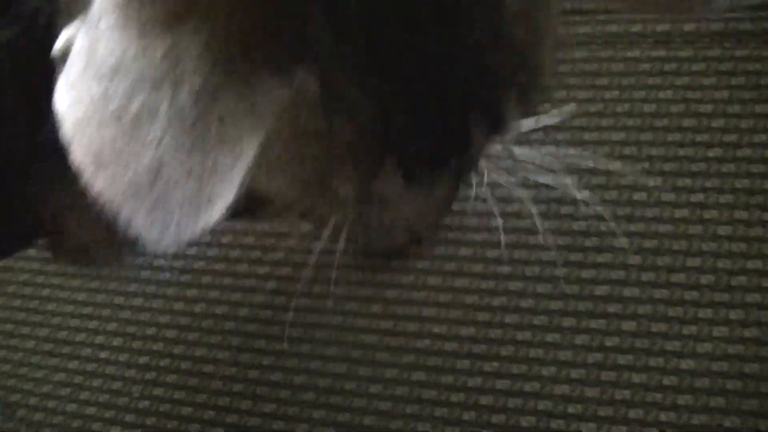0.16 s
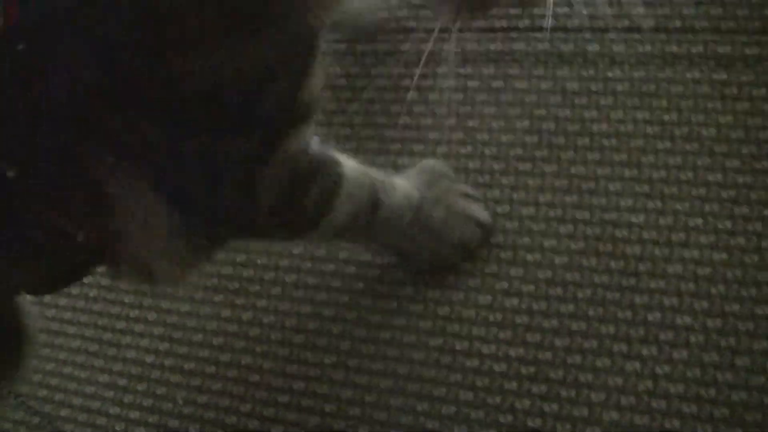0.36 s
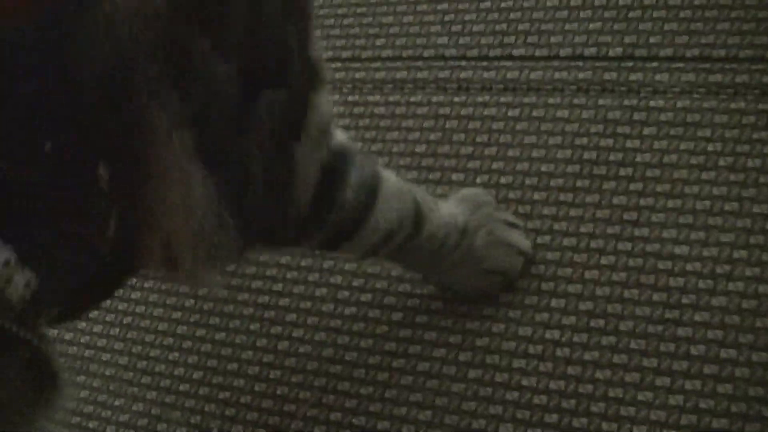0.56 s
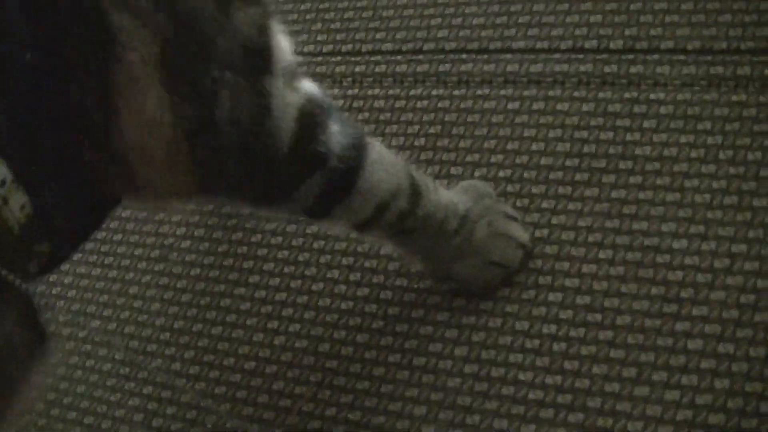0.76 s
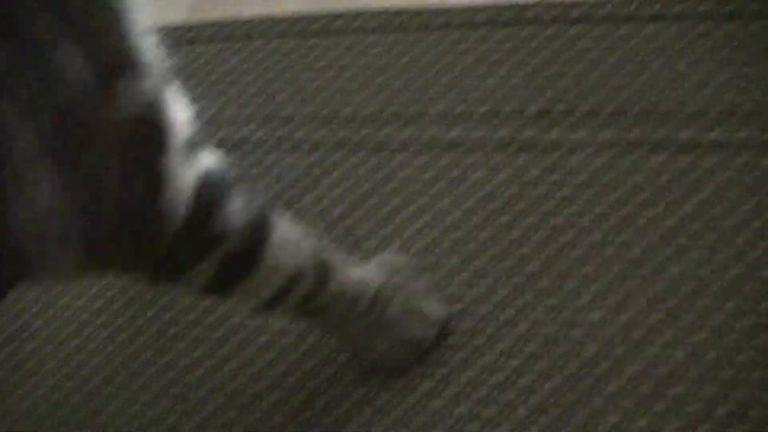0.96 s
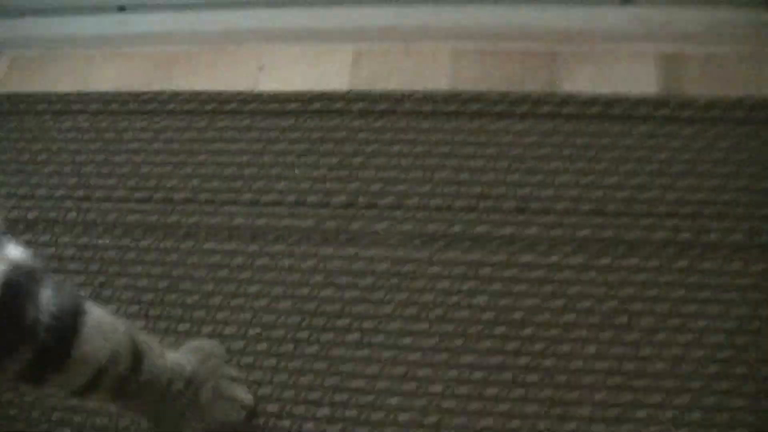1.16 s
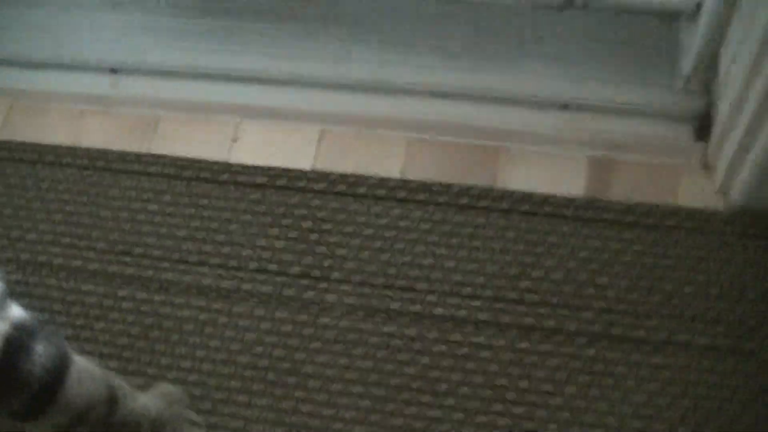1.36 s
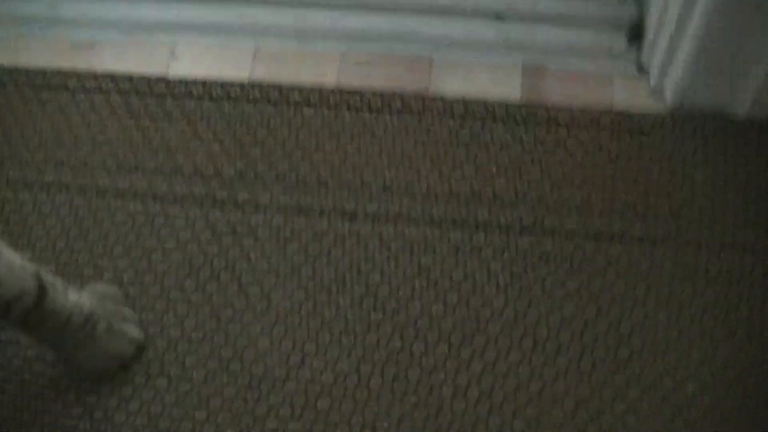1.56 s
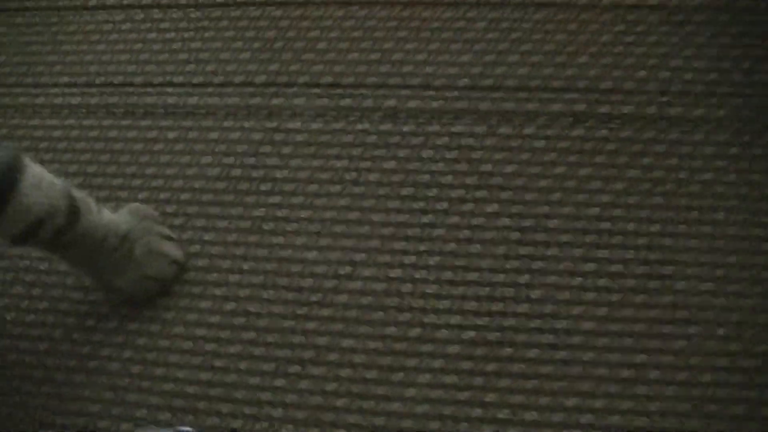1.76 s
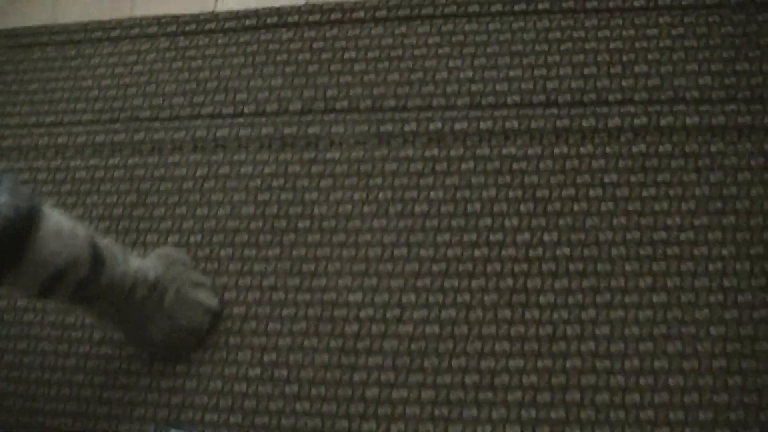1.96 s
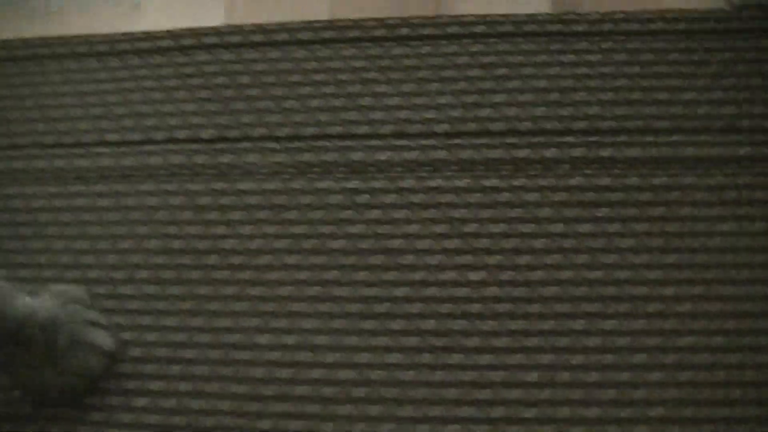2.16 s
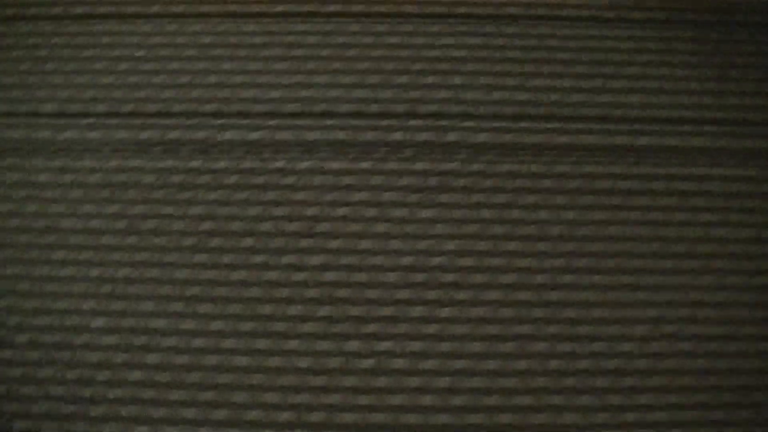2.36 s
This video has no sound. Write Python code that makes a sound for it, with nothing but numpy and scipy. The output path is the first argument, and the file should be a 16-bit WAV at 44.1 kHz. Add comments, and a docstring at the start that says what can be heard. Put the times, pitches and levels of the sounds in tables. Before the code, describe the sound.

Close, gritty claw scratching on a coarse floor mat, with crackly clicks and soft handling bumps

```python
"""Fingers handle a phone body and claws scratch, very close to the microphone, in a small room.
The dry clicks are each a sharp push, ringing modes, one short note and a crumble of noise.
The scrapes are gritty swells of random ticks and hiss, the slow ones a faint rustle.
The thuds are soft, dull blows with low ringing. Under it all lies the hush of the room, as coloured noise."""
import sys
import numpy as np
from scipy import signal
from scipy.fft import rfft, irfft, next_fast_len
from scipy.io import wavfile

SR = 44100
rng = np.random.default_rng(int(sys.argv[2]) if len(sys.argv) > 2 else 0)


def inscribe(sig):
    """Save sig as 16-bit PCM at rate SR to the path in sys.argv[1].

    A 1-D sig is mono; a 2-D sig holds one channel per row.
    Samples are clipped to [-1, 1] before scaling.
    """
    pcm = np.round(np.clip(np.atleast_2d(sig).T, -1, 1) * 32767)
    wavfile.write(sys.argv[1], SR, pcm.astype(np.int16))


N = 105840
TIME = np.arange(N) / SR  # seconds

# The room's hush. Each row: frequency in Hz, gain in dB.
HUSH_COLOUR = [(15, -32), (25, -3.5), (148, 3.5), (399, -3.5), (482, -1.5), (648, -3), (1050, -6.5),
               (1800, -15), (2010, -7), (3000, -9.5), (5140, -13.5), (6050, -21), (6920, -16),
               (9550, -14.5), (15500, -25.5)]
# The part of the hush that differs between the two ears. Each row: frequency in Hz, gain in dB.
WIDE_HUSH_COLOUR = [(15, -45), (25, -12), (160, 0.5), (368, -1), (537, -4), (2920, -8.5), (8350, -20.5),
                    (15500, -50)]
HUSH_DB, HUSH_WAVER_DB, HUSH_WAVER_HZ = -50, 2.5, 2.7
WIDE_HUSH_DB = -63

# Room tail; its level is set before the dulling
ROOM_T60_S, ROOM_DB, ROOM_DULL_HZ, ROOM_DELAY_S = 0.27, -12.5, 4500, 0.0031
SIDE_DB = -38  # the room's width
PAN_DB = -0.5  # left against right

# Soft dull thuds. Each row: start in seconds, level in dB, dull above this many Hz,
# dying time in seconds.
THUDS = [(.002, -45.5, 394, 0.08), (.227, -42, 454, 0.026), (0.3142, -36.5, 603, 0.041),
         (.38, -47, 248, 0.084), (.59, -46.5, 397, .04), (.7858, -20, 403, 0.0076),
         (.812, -32.5, 255, 0.038), (0.8506, -23.5, 950, 0.0023), (0.864, -35, 250, .025),
         (0.999, -48.5, 500, 0.069), (1.099, -34, 480, 0.012), (1.258, -35.5, 710, 0.011),
         (1.293, -31.5, 780, .01), (1.394, -24, 765, 0.0043), (1.45, -48.5, 397, 0.1),
         (2.11, -52, 250, 0.04), (2.221, -48.5, 300, .04), (2.288, -35.5, 450, 0.024)]
# Tone of a thud. Each row: frequency in Hz, gain in dB.
THUD_COLOUR = [(25, -38), (55, -14), (85, -0.5), (130, 8.5), (180, 4.5), (250, -3.5), (380, 2.5), (600, 1),
               (1000, -0.5)]
# What rings under a thud. Each row: frequency in Hz, level before colouring in dB, T60 in seconds.
THUD_MODES = [(81.6, -44.5, 0.22), (105, -47, 0.13), (177.7, -52, 0.14), (243.5, -51.5, 0.17),
              (347.4, -41, 0.065), (428, -57, 0.085)]
THUD_TAIL_DB = 0.5   # shower energy against the first push
BASS_CYCLES = 1.03   # tones that fit fewer cycles into a blow are hardly driven

# Gritty scrapes. Each row: time of the peak in seconds, rise time in seconds, fall time in seconds,
# level before brightening in dB, bite near 4.5 kHz in dB, top near 11 kHz in dB.
SCRAPES = [(.02, 0.22, 0.083, -40, -9, -7), (0.233, 0.0016, 0.0077, -30.5, -8, 6),
           (.291, 0.015, 0.023, -30.5, 6.5, 1), (.305, 0.018, .014, -29.5, -2, -7),
           (0.336, 0.03, .036, -28.5, -9.5, -9), (0.461, 0.0079, 0.016, -46.5, 3, 1),
           (0.578, 0.3, 0.33, -43, -2.5, -3.5), (0.835, 0.0076, 0.0046, -28.5, -17, -10),
           (0.868, 0.027, 0.15, -43, -0.5, 0), (0.989, 0.031, 0.032, -34, -8, 7),
           (1.043, 0.0092, 0.011, -42, 1, 13), (1.084, 0.015, 0.016, -29.5, -1.5, 2.5),
           (1.14, .01, 0.015, -52, 10, 14.5), (1.24, .025, 0.026, -52, 9.5, 13),
           (1.268, 0.014, 0.046, -33, -8.5, -1), (1.36, 0.015, 0.036, -39, -6, -11),
           (1.46, .06, 0.18, -41.5, -4, -1.5), (1.729, 0.023, 0.058, -43, -1.5, -3),
           (1.789, 0.031, 0.064, -40, -3.5, -9), (1.931, 0.036, 0.0058, -45, -2, -20),
           (1.985, 0.0087, 0.032, -41.5, -6.5, -16), (2.099, 0.019, 0.013, -42, -2, 1.5),
           (2.22, 0.018, 0.041, -44, -0.5, 10), (2.312, 0.039, 0.015, -29, -15.5, -3.5)]
# Tone of the friction. Each row: frequency in Hz, gain in dB.
SCRAPE_COLOUR = [(80, -17.5), (300, -5), (700, -4.5), (1500, -5.5), (2300, -3), (2950, 0.5), (3600, -4),
                 (5300, -8), (7000, -9), (12000, -19.5), (16000, -27)]
TICKS_PER_S, TICK_SPREAD_DB = 2800, 5.5
HISS_DB = 9.5  # hiss against the ticks
FLUTTER_HZ, FLUTTER_DB = 23.3, 1.9  # fastest swelling of the friction, and its depth

# Dry clicks. Each row: start in seconds, level before brightening in dB, bite near 4.5 kHz in dB,
# top near 11 kHz in dB, crumble time in seconds, crumble energy against the first push in dB,
# short note in Hz.
CLICKS = [(0.2256, -16, -1.5, 3, 0.0017, -1, 1070), (0.261, -33.5, 1.5, 1, 0.0011, 4, 3000),
          (0.3112, -15.5, 7.5, 2.5, 0.0015, 5, 1420), (.3365, -26, -20, -10, 0.001, -5, 1800),
          (0.3448, -24, -14, -4, 0.00049, 25, 1700), (0.788, -21.5, 5, 7.5, 0.0018, 2.5, 1900),
          (.7915, -27, 5.5, 15.5, 0.00093, 16, 1410), (0.8565, -28, -1.5, 5, 0.0013, -2, 2900),
          (.8682, -33.5, -5, 15.5, 0.00093, -1, 2230), (.987, -37, 9, 21, 0.0018, 18, 4470),
          (.9965, -32.5, 8.5, 14, 0.00066, 5, 4400), (1.0022, -37.5, 10, -10, 0.0015, 0, 885),
          (1.028, -36, 0, 5, .0025, -7, 2400), (1.255, -34.5, -16, 3, 0.001, 12.5, 675),
          (1.262, -37, 1, 10, 0.0025, 1, 1110), (1.315, -38, -2.5, 0, 0.0011, 6, 2480),
          (1.3962, -40.5, 2, 11, 0.0017, -3, 1160), (1.42, -37.5, 4, 11, .001, 4, 1820),
          (1.488, -50, 9, 8, 0.0016, 6, 2360), (1.6288, -52.5, 9, 33, 0.0018, 3, 7160),
          (1.701, -44.5, 4.5, 20, 0.0024, 13.5, 2140), (1.706, -36, -6, 1, 0.0034, 10, 1240),
          (1.9727, -35.5, -4.5, 2.5, 0.0018, 14, 1220), (2.0657, -40, -3, 1, 0.0013, -9, 655),
          (2.096, -41, -4, 7, .0035, 9, 2110), (2.213, -33.5, -9, 13.5, 0.0019, 4, 1190),
          (2.228, -38.5, -5, 4, 0.0012, 0, 1790), (2.261, -38.5, -0.5, 18, 0.0014, 1, 1200),
          (2.274, -45, 0, 21, 0.00065, 5, 700), (2.286, -30.5, -7, -5, 0.0016, 0, 1780),
          (2.29, -47, -1, 20, 0.0015, 19, 1100), (2.299, -39, -14, -7, 0.00067, 15, 1650),
          (2.311, -36, -39, 9, .0015, 8, 1550)]
# Tone of a click. Each row: frequency in Hz, gain in dB.
CLICK_COLOUR = [(60, -24), (250, -17.5), (550, 1.5), (1100, 0.5), (2600, 1), (3400, -4.5), (5400, -5),
                (6600, -12), (12000, -22), (16000, -41)]
# What rings under a click. Each row: frequency in Hz, level before colouring in dB, T60 in seconds.
CLICK_MODES = [(625, -54, 0.09), (668, -42, 0.079), (1131, -30.5, 0.023), (1290, -39, 0.038),
               (1480, -37, 0.051), (1800, -36, 0.048), (2024, -31.5, 0.037), (2365, -31.5, 0.018),
               (2974, -34, 0.017), (3960, -34.5, .014), (4410, -25.5, 0.0048), (4800, -55, 0.011)]
CLICK_SPAN_S = 0.0065  # the level is the rms over twice this span
SHOWER_RISE_S = 0.0045  # for clicks and thuds alike
NOTE_DB, NOTE_T60_S = -27, 0.011

CLIP_LEVEL, CUTOFF_HZ = 0.88, 16400


def from_db(db):
    """Decibels to gain."""
    return 10 ** (np.asarray(db) / 20)


def rms_one(x):
    """Scale to rms 1."""
    return x / np.sqrt(np.mean(x ** 2) + 1e-20)


def unit_energy(x):
    """Scale to a total energy of 1."""
    return x / np.sqrt(np.sum(x ** 2) + 1e-20)


def colour(x, points):
    """Causal (minimum-phase) equaliser through (Hz, dB) points."""
    size = 2 * next_fast_len(len(x))
    hz, db = np.transpose(points)
    grid = np.maximum(np.arange(size // 2 + 1) * SR / size, 1)
    gain_db = np.interp(np.log(grid), np.log(hz), db)
    # Folding the cepstrum onto positive time gives the minimum phase
    cepstrum = irfft(np.log(from_db(gain_db)))
    cepstrum[1:size // 2] *= 2
    cepstrum[size // 2 + 1:] = 0
    response = np.exp(rfft(cepstrum))
    return irfft(rfft(x, size) * response)[:len(x)]


def brighten(x, bite_db, top_db):
    """The sharpness of one contact: lifts or cuts the bite and the top."""
    return colour(x, [(1800, 0.036), (4500, bite_db), (11000, top_db)])


def lowpass(x, hz):
    """Second-order low-pass."""
    return signal.sosfilt(signal.butter(2, min(hz, SR / 2 - 100), fs=SR, output="sos"), x)


def highpass(x, hz):
    """Second-order high-pass."""
    return signal.sosfilt(signal.butter(2, hz, "high", fs=SR, output="sos"), x)


def drift(hz):
    """Slow random wander of rms 1, with the filter's first second dropped."""
    return rms_one(lowpass(rng.standard_normal(N + SR), hz)[SR:])


def add(out, s, x):
    """Mix x in at time s."""
    start = max(int(s * SR), 0)
    out[start:start + len(x)] += x[:N - start]


def hush():
    """The air of the room: gently wavering noise, slightly different in each ear."""
    level = from_db(HUSH_DB + HUSH_WAVER_DB * drift(HUSH_WAVER_HZ))
    mid = level * rms_one(colour(rng.standard_normal(N), HUSH_COLOUR))
    side = from_db(WIDE_HUSH_DB) * rms_one(colour(rng.standard_normal(N), WIDE_HUSH_COLOUR))
    return np.array([mid + side, mid - side])


def room(x):
    """A short, dull, diffuse tail of decaying noise, drawn afresh at each call."""
    t = TIME[:SR // 2]
    decay = from_db(-60 * t / ROOM_T60_S)
    tail = rng.standard_normal(len(t)) * decay * (t > ROOM_DELAY_S)
    return signal.fftconvolve(x, lowpass(unit_energy(tail), ROOM_DULL_HZ))[:N]


def blow(tail_s, tail_db, size=12000):
    """One sharp push, then a shower of tiny ones that swells and dies."""
    t = TIME[:size]
    shower = rng.standard_normal(size) * np.exp(-t / tail_s) * (1 - np.exp(-t / SHOWER_RISE_S))
    push = from_db(tail_db) * unit_energy(shower)
    push[0] = 1
    return push


def ring(x, modes):
    """The push itself plus the damped resonances that it sets ringing."""
    out = x.copy()
    for hz, db, t60 in modes:
        decay = from_db(-60 / (t60 * SR))  # per sample
        turn = 2 * np.pi * hz / SR
        zeros = [1, -decay * np.cos(turn)]
        poles = [1, -2 * decay * np.cos(turn), decay * decay]
        out += from_db(db) * signal.lfilter(zeros, poles, x + 1e-18)
    return out


def dull_thuds():
    """Soft blows that set low modes ringing; the briefer the blow, the less bass it drives."""
    out = np.zeros(N)
    for s, db, dull_hz, dying_s in THUDS:
        thud = colour(ring(blow(dying_s, THUD_TAIL_DB), THUD_MODES), THUD_COLOUR)
        thud = highpass(thud, BASS_CYCLES / dying_s)
        thud = unit_energy(lowpass(thud, dull_hz))
        add(out, s, from_db(db) * np.sqrt(dying_s * SR) * thud)
    return out


def scrapes():
    """Friction as random ticks over a hiss; each scrape swells and dies away."""
    sizes = from_db(TICK_SPREAD_DB * np.minimum(rng.exponential(1, N), 4))
    sizes = sizes * rng.choice([-1, 1], N)
    ticks = rms_one(sizes * (rng.random(N) < TICKS_PER_S / SR))
    grit = ticks + from_db(HISS_DB) * rng.standard_normal(N)
    flutter = from_db(FLUTTER_DB * drift(FLUTTER_HZ))
    friction = rms_one(colour(grit * flutter, SCRAPE_COLOUR))
    out = np.zeros(N)
    for s, rise_s, fall_s, db, bite_db, top_db in SCRAPES:
        swell = np.exp(-np.maximum((s - TIME) / rise_s, (TIME - s) / fall_s))
        stretch = np.roll(friction, rng.integers(N))  # each scrape starts elsewhere in the friction
        out += from_db(db) * swell * brighten(stretch, bite_db, top_db)
    return out


def dry_clicks():
    """A sharp push rings a set of modes and one short note, with a crumble of tiny pushes after it."""
    out = np.zeros(N)
    for s, db, bite_db, top_db, crumble_s, crumble_db, note_hz in CLICKS:
        modes = list(CLICK_MODES) + [(note_hz, NOTE_DB, NOTE_T60_S)]
        snap = blow(crumble_s, crumble_db)
        click = unit_energy(colour(ring(snap, modes), CLICK_COLOUR))
        level = from_db(db) * np.sqrt(2 * CLICK_SPAN_S * SR)
        add(out, s, level * brighten(click, bite_db, top_db))
    return out


def scene():
    """The handling and scratching are almost dead ahead; the room adds a trace of width."""
    contacts = dry_clicks() + dull_thuds() + scrapes()
    mid = contacts + from_db(ROOM_DB) * room(contacts)
    side = from_db(SIDE_DB) * room(contacts)
    left = (mid + side) * from_db(PAN_DB / 2)
    right = (mid - side) * from_db(-PAN_DB / 2)
    return np.array([left, right]) + hush()


def record(dry):
    clipped = np.clip(dry, -CLIP_LEVEL, CLIP_LEVEL)
    return signal.sosfilt(signal.cheby2(28, 70, CUTOFF_HZ, fs=SR, output="sos"), clipped)


dry = scene()
out = record(dry)
inscribe(out)
```